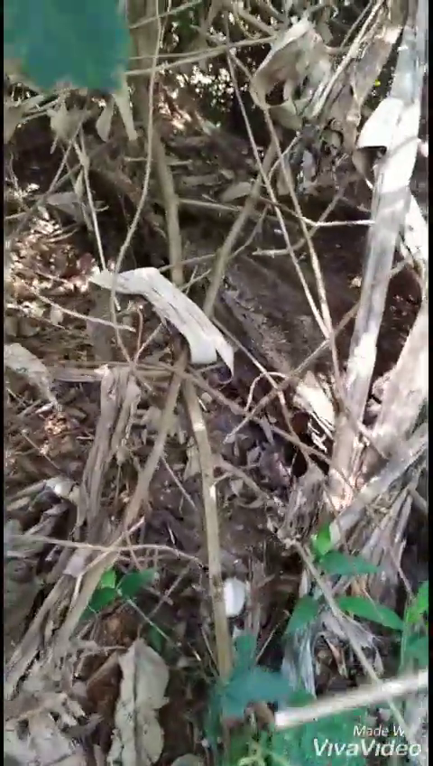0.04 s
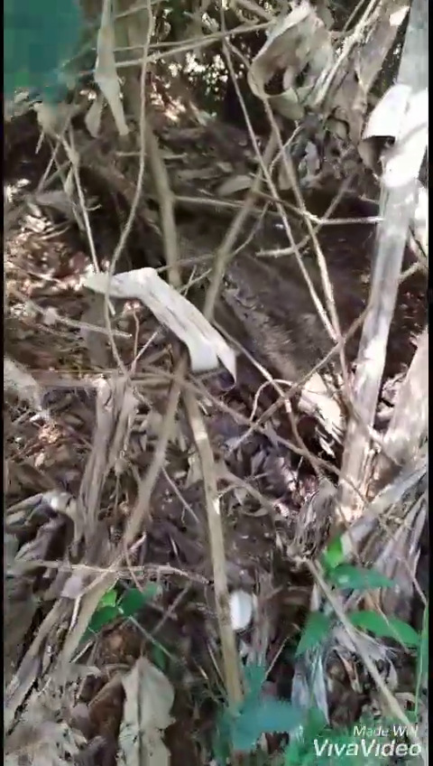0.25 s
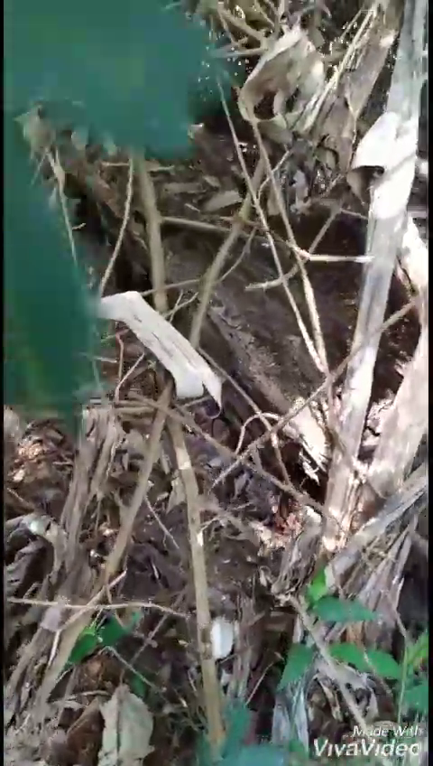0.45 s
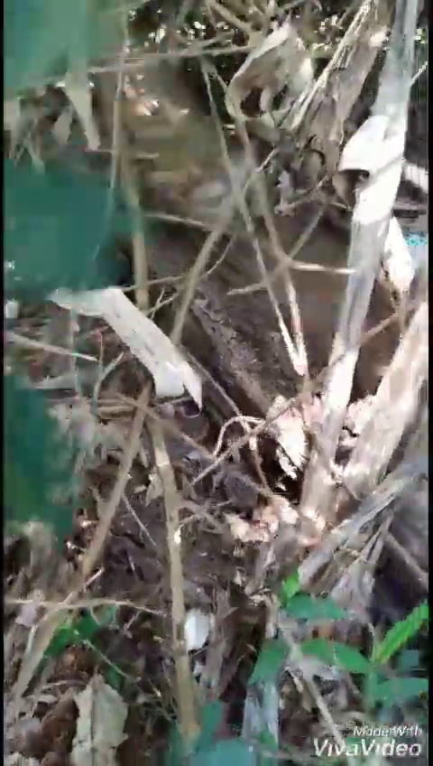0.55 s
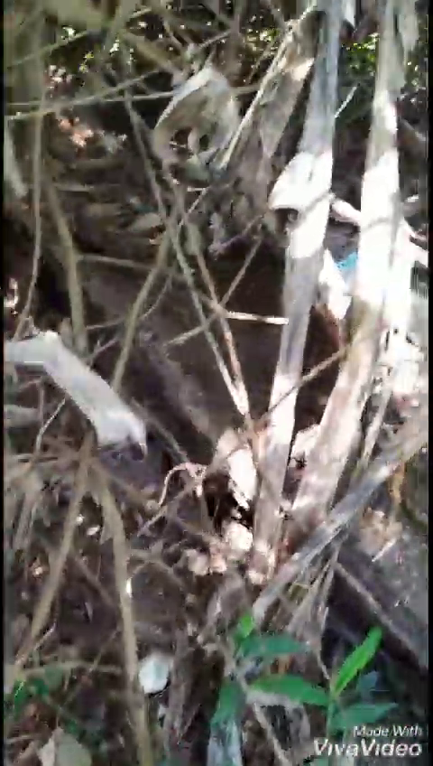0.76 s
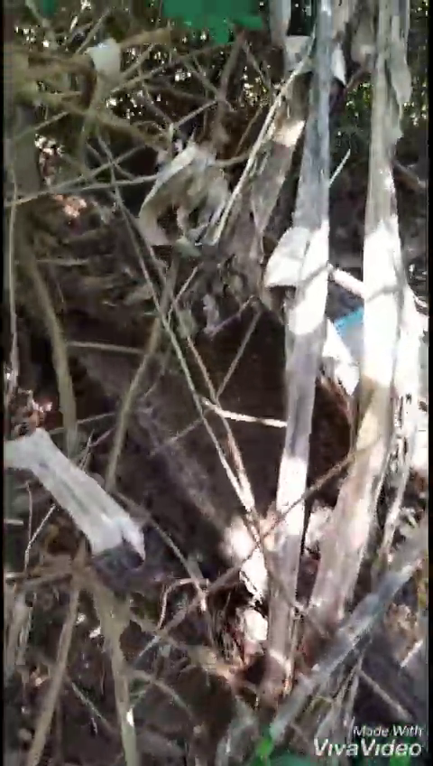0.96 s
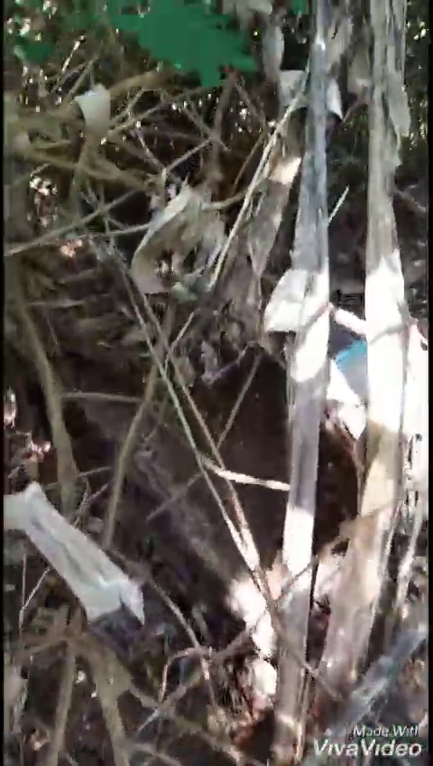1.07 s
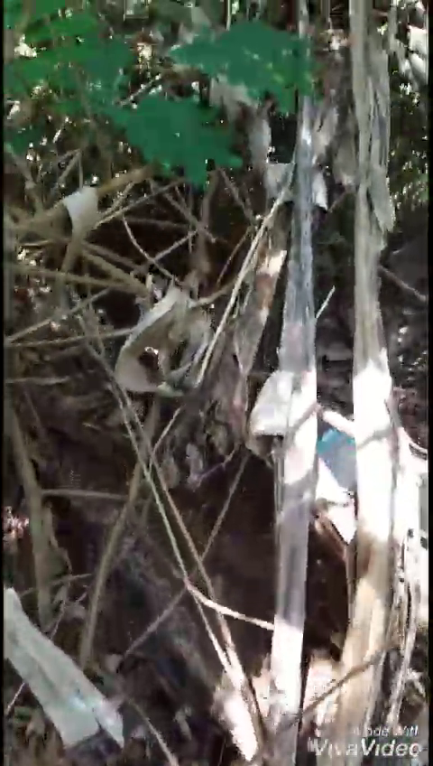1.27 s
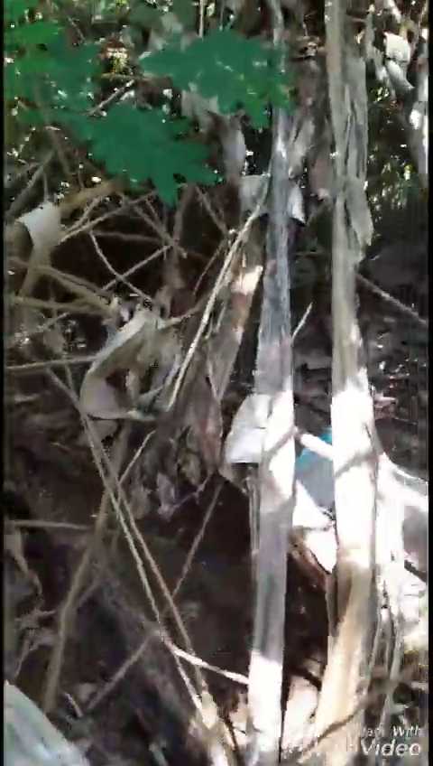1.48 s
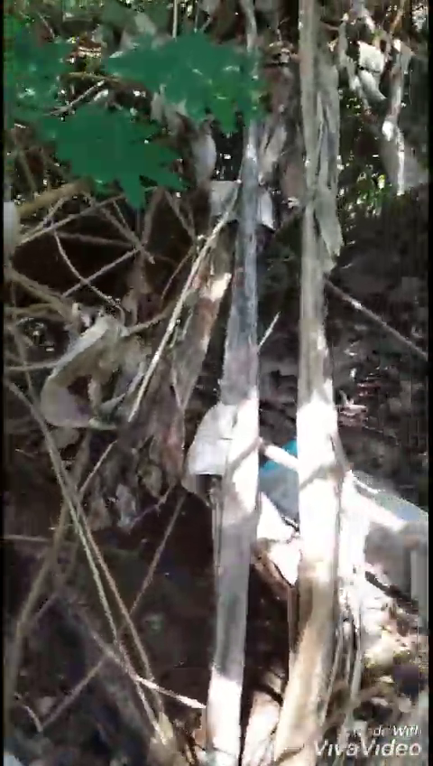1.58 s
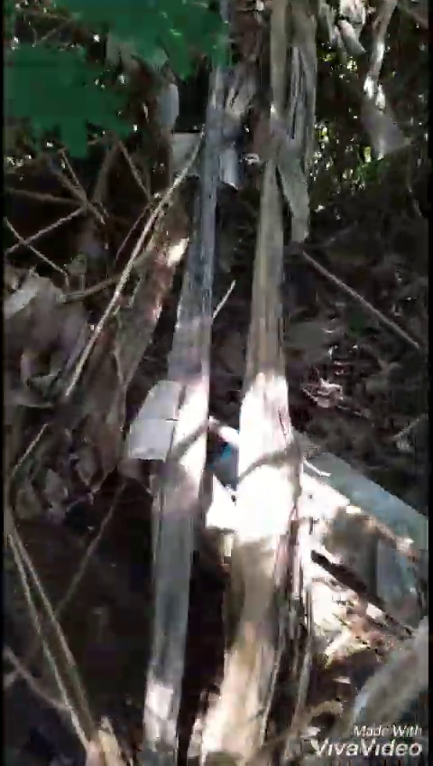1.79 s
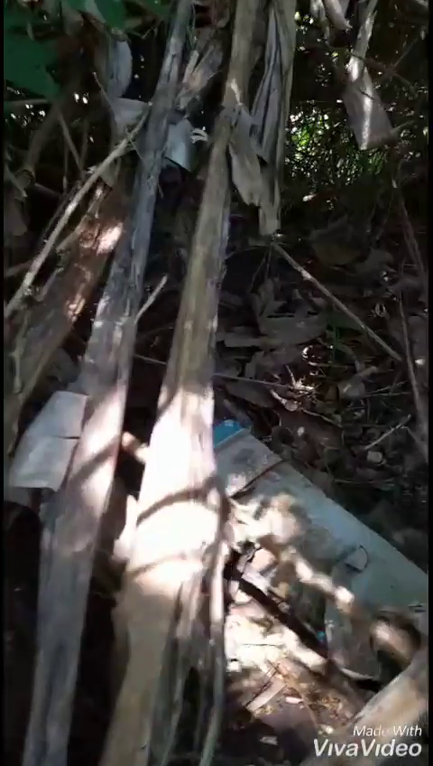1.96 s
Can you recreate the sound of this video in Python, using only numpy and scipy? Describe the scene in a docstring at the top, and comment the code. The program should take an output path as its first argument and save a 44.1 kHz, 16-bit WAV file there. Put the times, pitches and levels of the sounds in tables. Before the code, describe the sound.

Dry leaves rustle lightly with small snaps, then crunch loudly as someone pushes into them

```python
"""A dry thicket outdoors: someone edges in with a hand-held camera, then shoulders into a clump of dead leaves.
Under it lie a quiet hush and the camera's low rumble, both shaped noise, and the dull scuff of stems and clothes.
Stalks bump as stuttering slips through a hollow resonance; blades snap as a break, a tearing burst and a ring.
Leaves slide past as a spray of tiny ringing fractures, light at first and then hard.
Leaves, snaps and stalks lean to the left and scatter in the brush."""
import sys
import numpy as np
from scipy import signal
from scipy.fft import rfft, irfft, next_fast_len
from scipy.io import wavfile
from scipy.ndimage import uniform_filter1d

SR = 44100
rng = np.random.default_rng(int(sys.argv[2]) if len(sys.argv) > 2 else 0)


def dump(signal):
    """Clip the signal to [-1, 1] and save it as 16-bit WAV at the path in sys.argv[1]."""
    limited = np.clip(np.atleast_2d(signal).T, -1, 1)
    pcm = np.round(limited * 32767).astype(np.int16)
    wavfile.write(sys.argv[1], SR, pcm)


N = 89214
T = np.arange(N) / SR
LEAD_S, RIGHT_DB = 0.0004382, -5.5  # the left port hears snaps and stalks earlier and louder
SCATTER_HZ = 1800  # leaves are too small to scatter much below this
TOP_HZ, LOW_CUT_HZ = 15600, 33.6


def amp(db):
    """Decibels to gain."""
    return 10 ** (np.asarray(db) / 20)


def unit(x):
    """Scales to rms 1."""
    return x / np.sqrt(np.mean(x ** 2) + 1e-20)


def along(points, hz):
    """Reads a curve on a log-frequency axis."""
    f, v = np.transpose(points)
    return np.interp(np.log(abs(hz) + 1), np.log(f), v)


def level(points):
    """Gain over time from a dB curve."""
    return amp(np.interp(T, *np.transpose(points)))


def drift(per_s):
    """Random curve of rms 1, bending per_s times a second."""
    knots = rng.standard_normal(2000)
    return unit(np.interp(T * per_s + rng.random(), np.arange(len(knots)), knots))


def colour(x, tone, size=4096):
    """Minimum-phase filter with the given spectral shape and unit energy."""
    log_gain = np.log(amp(along(tone, np.fft.fftfreq(size, 1 / SR))))
    response = np.exp(np.conj(signal.hilbert(log_gain)))
    h = np.fft.ifft(response).real[:size // 2]
    return signal.fftconvolve(x, h[None] / np.linalg.norm(h), axes=1)[:, :N]


def ring(x, hz, width):
    """One damped resonance, width in Hz."""
    r = np.exp(-np.pi * width / SR)
    return signal.lfilter([1, 0, -1], [1, -2 * r * np.cos(2 * np.pi * hz / SR), r * r], x)


def add(mix, s, sound):
    """Mixes a sound in at time s."""
    part = mix[:, max(round(s * SR), 0):][:, :sound.shape[1]]
    part += sound[:, :part.shape[1]]


def ports(x, lead, right_db):
    """One sound at two microphone ports, the right one later by lead seconds."""
    delay = round(lead * SR)
    late = np.roll(x, delay) * (np.arange(len(x)) >= delay)
    return np.array([x, amp(right_db) * late])


def thicket(x, near_db, near_t60, far_db, far_t60):
    """Adds quick scatter from nearby leaves and a faint tail from the brush beyond, mostly treble."""
    t = T[:SR // 3]
    near, far = rng.standard_normal((2, 2, len(t))) * (t > .0007)
    near = near * amp(-60 * t / near_t60)
    far = far * amp(-60 * t / far_t60)
    h = (amp(near_db) * unit(near) + amp(far_db) * unit(far)) / np.sqrt(len(t))
    h = signal.lfilter(*signal.butter(1, SCATTER_HZ, "high", fs=SR), h)
    return x + signal.fftconvolve(x, h, axes=1)[:, :N]


# how alike left and right are in the noise beds: f/Hz, correlation [-1 to 1]
LIKENESS = [(50, 0.73), (200, 0.86), (400, 0.55), (800, 0.13), (2000, 0)]


def air(tone):
    """Steady noise of rms 1, alike in both ports at low pitch and independent higher up."""
    size = next_fast_len(N, True)
    hz = np.fft.rfftfreq(size, 1 / SR)
    a, b = rfft(rng.standard_normal((2, size)))
    c = np.clip(along(LIKENESS, hz), -1, 1)
    pair = np.array([a, c * a + np.sqrt(1 - c * c) * b])
    return unit(irfft(pair * amp(along(tone, hz)), size)[:, :N])


# spectral shape of the hush: f/Hz, level/dB [per Hz, relative]
HUSH_TONE = [(30, 9.5), (120, -0.5), (250, -10.5), (500, -1.5), (1000, -9.5), (2000, -8), (4000, -28),
             (15000, -31)]


def hush():
    """The quiet outdoors is steady noise, strongest at low pitch."""
    return amp(-63.5) * air(HUSH_TONE)


# strength of the camera rumble: t/s, level/dB
RUMBLE = [(0, -60), (.025, -56), (.15, -54), (.18, -62), (.28, -55), (.31, -66), (.35, -53), (.41, -65.5),
          (.52, -62.5), (.56, -46.5), (.6, -58), (.67, -55.5), (.71, -63), (.77, -51), (.81, -57.5),
          (1.05, -56.5), (1.22, -55.5), (1.3, -60.5), (1.45, -64), (1.56, -63.5), (1.61, -51), (1.65, -64),
          (1.72, -52), (1.75, -61), (1.88, -55), (2.02, -67)]
# spectral shape of the rumble before evening out: f/Hz, level/dB [per Hz, relative]
RUMBLE_TONE = [(15, -60), (25, -42), (38, -23), (54, -3.5), (78, -0.5), (100, -12.5), (130, -29.5),
               (250, -59), (1000, -82)]


def rumble():
    """The hand sways the camera without pause: low noise, its own swells evened out, rides the level curve."""
    sway = air(RUMBLE_TONE)
    power = uniform_filter1d((sway ** 2).mean(0), size=2600)
    swell = np.sqrt(power + .05)
    return unit(sway / swell) * level(RUMBLE)


# soft low scuffing of stems and clothes, before the lumps: t/s, level/dB
SCUFF = [(0, -74.5), (.09, -68), (.4, -72), (.7, -69), (.8, -70), (.88, -64), (.98, -66), (1.1, -72.5),
         (1.23, -64), (1.33, -64), (1.42, -68.5), (1.49, -61.5), (1.57, -72), (1.62, -61.5), (1.66, -77),
         (1.72, -54), (1.78, -51.5), (1.83, -57.5), (1.95, -54), (2.02, -58)]
# spectral shape of the scuffing: f/Hz, level/dB [per Hz, relative]
SCUFF_TONE = [(40, -33), (90, 4), (160, 1.5), (240, 5), (450, 0), (750, -1), (1000, -0.5), (1250, -14),
              (2500, -30), (8000, -50)]


def scuff():
    """Dull friction is low noise made lumpy by a random gain, a little louder in the left port than the right."""
    lumps = amp(2.2 * drift(70))
    return air(SCUFF_TONE) * level(SCUFF) * lumps * amp(0) * np.array([[1], [-1]]) * SCUFF_SIDES


# gain of the scuffing in the left and right port
SCUFF_SIDES = amp([[1], [-1]]) * np.array([[1], [-1]])


# stalks bumping and scraping: t/s, level/dB [before scaling by length], length/s, f/Hz [hollow pitch]
STALKS = [(.036, -51, 0.0034, 1470), (0.08, -58, 0.0053, 1460), (0.155, -56.5, 0.015, 1490),
          (.826, -54, 0.018, 1350), (.828, -67, .01, 640), (0.873, -57.5, 0.011, 1430),
          (1.33, -52.5, 0.0046, 800), (1.49, -66, 0.018, 337), (1.616, -61.5, 0.02, 1690),
          (1.676, -48, 0.022, 3200), (1.76, -41, 0.0048, 1200), (1.811, -34, 0.0021, 1620),
          (1.8738, -41, .004, 980), (1.885, -37, 0.0064, 2220), (1.942, -36, 0.013, 2430),
          (2.001, -38.5, 0.015, 2470)]


def stalks():
    """A stalk slips in a quick stutter that sounds its hollow resonance."""
    out, t = np.zeros((2, N)), T[:4096]
    for s, db, length, hz in STALKS:
        stutter = rng.random(len(t)) < 5000 / SR  # 5000 slips per second on average
        slips = rng.standard_normal(len(t)) * stutter * np.exp(-(t / length) ** 2)
        sound = unit(ring(slips, hz, width=0.24 * hz)) * np.sqrt(length / t[-1])
        add(out, s, ports(amp(db) * sound, LEAD_S, RIGHT_DB))
    return thicket(out, near_db=-5, near_t60=.04, far_db=-12, far_t60=.2)


# snapping blades: t/s, level/dB [of the tear, before scaling by length and colour], tearing time/s,
# first break/dB [against tear], tilt/dB [per octave], f/Hz [ring], ring/dB [against tear]
SNAPS = [(0.0157, -49.5, .0013, -12, 0, 8400, 2), (0.0368, -36, 0.00092, -6, -2.5, 4570, -5),
         (0.0801, -39.5, 0.0037, -9, -2, 10740, -6), (0.2187, -45, 0.0015, -10, 5, 8400, -2),
         (0.316, -46.5, 0.0018, -10, 1, 13500, -10), (0.4597, -35.5, 0.0009, -6.5, 0.5, 9900, -9),
         (.4741, -49, 0.0022, -12, -5, 13600, -4), (0.5508, -44.5, 0.0032, -4, -1, 5070, -26),
         (0.557, -48, 0.0021, -12, -5, 2080, 6), (.567, -54, .0015, -3, 5, 7000, -12),
         (.6153, -46, .0015, -3, -3, 7500, -10), (.6504, -43, 0.0023, -4, 1, 4600, -7),
         (0.676, -48, 0.0076, -15, 0, 4700, -10), (0.699, -43.5, .004, -15, -2, 4600, -10),
         (0.755, -43, .0043, -16, 1, 6080, -2.5), (.824, -43.5, .003, -10, -2, 6100, -11),
         (0.839, -42, 0.0011, -3, 6, 12200, -2), (.9287, -39.5, .001, -5, -1.5, 8530, 6.5),
         (0.9873, -48, .0015, -2, 0, 10900, 1.5), (1.066, -50, 0.0018, -12, 2, 8300, -7),
         (1.091, -44, .0012, -10, -2.5, 11200, -10), (1.25, -39.5, 0.0015, -8, -5, 8850, -11),
         (1.2536, -37, 0.0013, -11, 0, 10800, -1.5), (1.2659, -34.5, 0.0021, 3.5, 1.5, 7160, -8),
         (1.3114, -45.5, 0.0029, -14, 3, 10700, -8), (1.332, -46, .0014, -12, 2, 9000, -11),
         (1.338, -41.5, 0.00083, -4, 3, 8300, 4.5), (1.4555, -48, 0.0039, -12, 2, 7600, 2),
         (1.4621, -27, 0.00062, -6, -1, 7800, -2), (1.4655, -44, 0.0011, -6, 1, 11000, -10),
         (1.4703, -42, .002, -11, -3, 10400, 2), (1.483, -45, .0012, -10, -2, 11000, -9),
         (1.4919, -33, 0.0032, -10, -1.2, 5100, -8), (1.496, -37.5, 0.0018, -4, -3.5, 9700, -9),
         (1.503, -52, .0015, -6, 0, 5000, 0), (1.6758, -34, 0.0054, -13, 2, 7930, -4.5),
         (1.7099, -23, 0.0039, -11, 0.5, 10800, -8.5), (1.7195, -23, 0.001, -8, -3, 9400, -6),
         (1.747, -13.5, 0.00091, -10, 0, 4500, -3.5), (1.758, -26.5, 0.0033, -16, 0, 9640, -5),
         (1.764, -15.5, 0.0024, -8, -2, 9320, -7), (1.772, -30, .001, -5, -1, 4500, -8),
         (1.804, -25, 0.00091, -3, -5, 8500, -12), (1.812, -21.5, 0.0018, -8, -2, 10000, -11),
         (1.819, -20.5, 0.00034, 6.5, -0.5, 9800, -12), (1.8392, -30, 0.0022, -12, -1, 12900, 3),
         (1.844, -17.5, .0019, -14, -2, 5200, -15), (1.866, -33, 0.0011, 0, 3, 7000, -12),
         (1.8769, -9, .0015, -8, -1.7, 6320, -6.5), (1.8794, -22, 0.0022, -12, -1, 2700, 5.5),
         (1.9118, -22, 0.0014, -14, 1.5, 9660, 0.5), (1.915, -20, 0.0036, -8, -0.5, 8000, -2),
         (1.9283, -20.5, .0012, -5, 6, 8500, -1), (1.948, -23, 0.0013, -11, 4, 2400, 2),
         (1.9661, -25, 0.0032, -15, -0.5, 5300, -7), (1.9717, -17, 0.0028, -11, -2, 2350, 6),
         (2.003, -20.5, 0.0024, -2, 6, 2670, -7), (2.0062, -22, 0.0039, -11, -6.5, 8000, -8)]
# spectral shape shared by the snaps: f/Hz, level/dB [per Hz, relative]
SNAP_TONE = [(100, -10.5), (600, -17.5), (1800, -9), (2800, -8), (4200, -1), (7000, -0.5), (11000, -1.5),
             (15500, 5.5)]
# how much of the snaps is sent into the scatter: t/s, level/dB
SCATTER_SEND = [(0, 3), (1.3, -2), (1.5, -2), (1.75, -2.5)]


def snaps():
    """A blade breaks at once, tears on in a short burst of cracks and crumbs, and rings as it tears."""
    out, t = np.zeros((2, N)), T[:2048]
    for s, db, length, break_db, tilt_db, hz, ring_db in SNAPS:
        first = rng.choice([-1, 1], len(t)) * np.exp(-t / 0.00013)
        onset = 1 - np.exp(-t / (0.25 * length))
        tear = rng.standard_normal(len(t)) * onset * np.exp(-(t / length) ** 2)
        z = rfft(unit(tear) + amp(break_db) * unit(first))
        crack = irfft(z / np.sqrt(abs(z))) * (t < 4 * length)  # halves the spectral peaks and dips in dB
        sparse = rng.random(len(t)) < .04
        crumbs = rng.standard_normal(len(t)) * sparse * np.exp(-t / (3 * length))
        tilt = [(f, tilt_db * np.log2(f / 7000)) for f in (1500, TOP_HZ)]
        crack = colour((unit(crack) + amp(-11) * unit(crumbs))[None], tilt)[0, :len(t)]
        blade = np.sin(2 * np.pi * hz * t) * np.exp(-t / (.45 * length))
        sound = unit(crack) * np.hypot(1, amp(break_db)) + amp(ring_db) * unit(blade)
        add(out, s, ports(sound * amp(db) * np.sqrt(length / t[-1]), LEAD_S, RIGHT_DB))
    out = colour(out, SNAP_TONE)
    sent = out * level(SCATTER_SEND)
    return out - sent + thicket(sent, near_db=-2.5, near_t60=0.023, far_db=-4.5, far_t60=0.027)


def rustle(curve, tone, per_s, spread_db, clump_db, patchy_db, wander_db, width, right_db, near_db, count=120):
    """Tiny fractures in clumps ring many leaves, which come and go while the favoured pitches wander."""
    out = np.zeros((2, N))
    wander_a, wander_b = drift(22), drift(22)
    for hz in np.linspace(np.sqrt(800), np.sqrt(16000), count) ** 2:
        when, chance, side = rng.random((3, 600))
        at = (when * N).astype(int)
        turn = np.pi * np.log2(hz)  # the favoured pitches repeat every two octaves
        patches = np.interp(when, np.linspace(0, 1, 45), rng.standard_normal(45))
        favour = wander_a[at] * np.cos(turn) + wander_b[at] * np.sin(turn)
        activity_db = patchy_db * patches + wander_db * favour
        size_db = spread_db * np.minimum(rng.exponential(1, len(when)), 3.2) + activity_db
        happens = chance < per_s * T[-1] / count / len(when)
        clicks = np.bincount(at, amp(size_db) * np.sign(side - .5) * happens, N)
        leaf = unit(ring(clicks, hz, width * np.sqrt(hz))) * np.sqrt(np.sqrt(hz))
        lead = LEAD_S + .00005 * rng.standard_normal()  # the lead spreads slightly from leaf to leaf
        out += ports(leaf, lead, right_db)
    out *= amp(clump_db * drift(600))
    spray = thicket(colour(out, tone), near_db=near_db, near_t60=0.034, far_db=-6.0, far_t60=0.096)
    return unit(spray) * level(curve)


# light brushing against leaves: t/s, level/dB
BRUSH = [(0, -56.5), (.04, -55), (.1, -52.5), (.14, -56.5), (.3, -59.5), (.44, -60.5), (.475, -57.5),
         (.54, -59), (.56, -54.5), (.66, -50), (.755, -50), (.79, -55), (.89, -54), (.99, -54.5),
         (1.04, -60), (1.13, -60.5), (1.2, -55.5), (1.31, -55), (1.36, -59.5), (1.44, -58), (1.5, -49.5),
         (1.58, -56.5), (1.66, -54.5)]
# spectral shape of the light brushing, before scatter: f/Hz, level/dB [per Hz, relative]
BRUSH_TONE = [(100, -45), (600, -6.5), (1200, -2), (1550, -5.5), (2100, -6), (3000, -0.5), (4200, -1),
              (5500, -2), (8500, 0.5), (12000, -1.5), (15500, -2)]


def light_brushing():
    """Light contact makes fewer fractures of more even size, with little clumping."""
    return rustle(BRUSH, BRUSH_TONE, per_s=7000, spread_db=2.5, clump_db=0.15, patchy_db=2.0,
                  wander_db=1.5, width=12.4, right_db=-1.3, near_db=-4.0)


# hard push through dead leaves: t/s, level/dB
PUSH = [(1.664, -83), (1.671, -52), (1.678, -39.5), (1.703, -38), (1.716, -32.5), (1.79, -34.5),
        (1.83, -31), (1.862, -30.5), (1.885, -28), (1.905, -29.5), (1.935, -30), (1.96, -29.5), (1.99, -33),
        (2.008, -27.5)]
# spectral shape of the crushed leaves, before scatter: f/Hz, level/dB [per Hz, relative]
PUSH_TONE = [(60, -13), (200, 1), (550, 0.5), (1000, -5.5), (1300, -7.5), (1900, -7.5), (2500, -1.5),
             (3400, -3), (4300, -2.5), (6500, -3), (9600, -1), (11000, -2), (15500, -15)]


def hard_push():
    """Crushing makes denser, more uneven and clumpier fractures, and the leaves ring longer."""
    return rustle(PUSH, PUSH_TONE, per_s=12000, spread_db=3.0, clump_db=1.5, patchy_db=4.5,
                  wander_db=1.3, width=8.1, right_db=-1.5, near_db=-3.0)


def scene():
    """Hush, camera rumble and scuffing under the stalks, snaps and rustle."""
    background = hush() + rumble() + scuff()
    return background + stalks() + snaps() + light_brushing() + hard_push()


def record(dry):
    """The recorder's low cut and band limit."""
    low_cut = signal.butter(4, LOW_CUT_HZ, "high", fs=SR, output="sos")
    band_limit = signal.firwin(201, TOP_HZ, window=("kaiser", 9), fs=SR)
    return signal.oaconvolve(signal.sosfilt(low_cut, dry), band_limit[None], "same")


dry = scene()
out = record(dry)
dump(out)
```